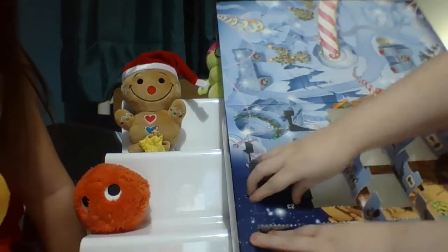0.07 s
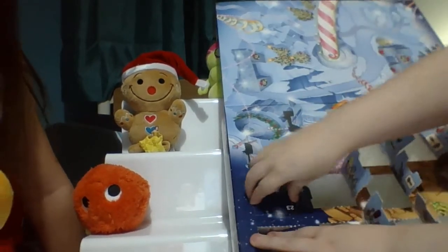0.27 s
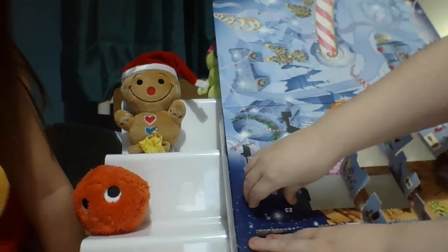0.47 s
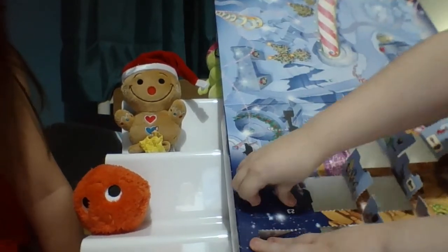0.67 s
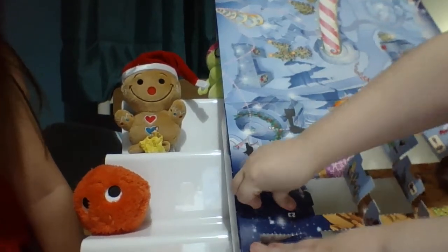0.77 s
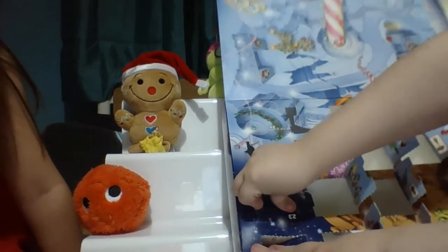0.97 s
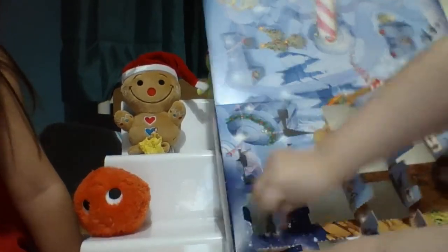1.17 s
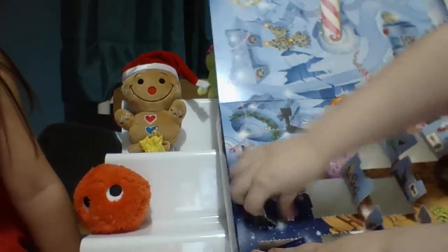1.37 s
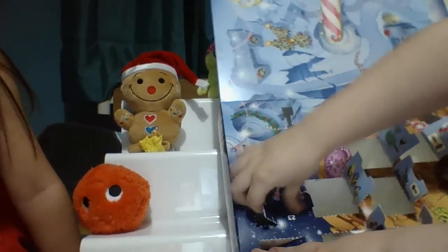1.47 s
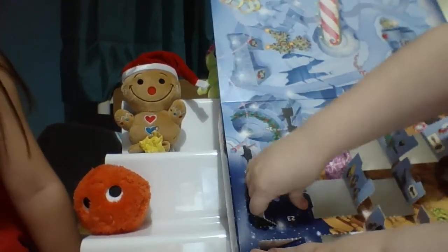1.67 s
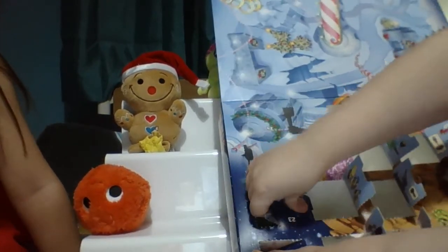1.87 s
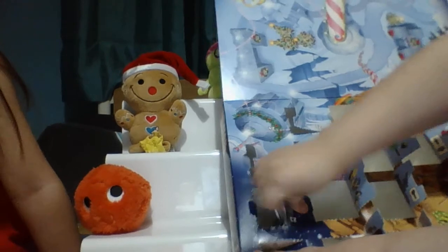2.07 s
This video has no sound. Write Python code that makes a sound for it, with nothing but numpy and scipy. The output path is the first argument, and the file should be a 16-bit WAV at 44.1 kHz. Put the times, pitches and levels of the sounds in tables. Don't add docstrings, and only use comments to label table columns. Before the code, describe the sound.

A perforated cardboard door is felt by fingers, then breaks with a bright loud pop, crackles as the flap is worked and tears open in a final clustered snap, close up, with short room echoes and faint hiss.

```python
import sys
import numpy as np
from scipy import signal
from scipy.fft import rfft, irfft, next_fast_len
from scipy.io import wavfile
from scipy.ndimage import uniform_filter1d

SR = 44100
rng = np.random.default_rng(int(sys.argv[2]) if len(sys.argv) > 2 else 0)


def pcm_store(signal):
    levels = np.round(np.clip(np.atleast_2d(signal), -1, 1) * 32767)
    wavfile.write(sys.argv[1], SR, levels.astype(np.int16).T)


def how_loud(loudness_db):
    steps = np.asarray(loudness_db, float) / 20
    return 10 ** steps


N = 94065


def unit(x):
    return x / np.sqrt(np.mean(x ** 2) + 1e-20)


def along(points, hz):
    f, v = np.transpose(points)
    return np.interp(np.log(hz + 1), np.log(f + 1), v)


def filtered(x, response):
    m = next_fast_len(x.shape[-1] + 8192)
    spectrum = rfft(x, m) * response(np.fft.rfftfreq(m, 1 / SR))
    return irfft(spectrum, m)[..., :x.shape[-1]]


def causal(gain):
    c = irfft(np.log(np.maximum(gain, 1e-6)))
    c[1:len(c) // 2] *= 2
    c[len(c) // 2 + 1:] = 0
    return np.exp(rfft(c))


def ring(f, peaks):
    total = 0
    for k, (centre, width, db) in enumerate(peaks):
        damping = 1j * f * width
        total = total + (-1) ** k * how_loud(db) * damping / (centre * centre - f * f + damping)
    return total


# (frequency [Hz], density [dB per Hz])
HUSH_SPECTRUM = [(47, -90.5), (80, -12.5), (190, 5), (408, -9.5), (460, 1.5), (605, -6.5), (722, -4),
                 (3760, -13.5), (8750, -26.5), (11400, -50.5), (19200, -120)]


def air():
    hush = filtered(rng.standard_normal(N), lambda f: how_loud(along(HUSH_SPECTRUM, f)))
    whine = filtered(rng.standard_normal(N), lambda f: ring(f, [(1570, 12, 0)]))
    return how_loud(-66) * unit(hush) + how_loud(-79.5) * unit(whine)


def bent(table, s, hz):
    _, hz_a, db_a, hz_b, db_b = [row for row in table if row[0] <= s][-1]

    def bump(centre):
        octaves = np.log2((hz + 1) / centre)
        return np.exp(-.5 * (octaves / .14) ** 2)

    return how_loud(db_a * bump(hz_a) + db_b * bump(hz_b))


def even(spectrum, hz):
    smooth_hz = 220
    power = abs(uniform_filter1d(abs(spectrum) ** 2, round(smooth_hz / hz[1])))
    return spectrum * causal(np.sqrt(power.mean() / (power + 1e-20)))


# (time [s], crack peak [dB], panel peak [dB], burst length [s], brightness [dB])
TOUCH = [(0.0425, -58, -48, 0.008, -10), (0.066, -52, -52, 0.005, -11), (0.103, -48, -46, 0.008, -10),
         (0.135, -54, -54, 0.004, -1), (0.147, -62, -53, 0.008, -7), (0.195, -61, -57, 0.008, -9),
         (0.235, -60, -57, 0.008, -6), (0.315, -57, -54, 0.004, -5), (0.349, -54, -54, 0.004, -14),
         (0.36, -56, -54, 0.008, -11), (0.372, -53, -55, 0.008, -9), (0.384, -55, -49, 0.004, -7),
         (0.411, -53, -54, 0.004, -13), (0.422, -54, -52, 0.008, -13), (0.433, -54, -52, 0.009, -14),
         (0.49, -59, -60, 0.02, -2), (0.55, -59, -61, 0.02, -2), (0.62, -59, -56, 0.015, -6),
         (0.725, -58, -57, 0.01, -4), (0.75, -57, -55, 0.02, -7), (0.785, -59, -60, 0.002, -8),
         (0.824, -56, -58, 0.002, -7), (0.868, -58, -62, 0.002, -4)]
PUSH = [(1.0745, -21, -30, 0.002, -1), (1.0776, 2, -11, 0.0035, -1), (1.0815, 2, -11, 0.0015, -6),
        (1.085, -14, -10, 0.001, -3), (1.0915, -15, -17, 0.002, -5), (1.0968, -8, -15, 0.0005, -3),
        (1.1092, -13, -19, 0.001, -8), (1.1118, -20, -10, 0.003, -8), (1.1192, -16, -19, 0.002, -2),
        (1.976, -33, -38, 0.005, -3), (1.9828, -2, -3, 0.0018, -10), (1.9895, -18, -14, 0.001, -10),
        (2.0012, -12, -6, 0.0015, -7), (2.0242, 0, -5, 0.002, -6), (2.0275, -3, -6, 0.0015, -16),
        (2.0368, -15, -15, 0.003, -9), (2.0452, -9, -9, 0.0015, -12), (2.054, -20, -15, 0.002, -11),
        (2.073, -21, -19, 0.002, -8), (2.087, -26, -29, 0.003, -9), (2.1025, -20, -17, 0.001, -5),
        (2.1105, -30, -25, 0.002, -3)]
CRACKLE = [(1.3432, -29, -42, 0.0015, -6), (1.3452, -21, -29, 0.003, -11), (1.3525, -29, -29, 0.007, -11),
           (1.361, -28, -32, 0.003, 0), (1.3705, -42, -43, 0.003, -2), (1.3975, -56, -45, 0.005, -7),
           (1.4085, -20, -27, 0.002, -5), (1.4155, -34, -30, 0.006, -9), (1.4255, -40, -35, 0.004, -3),
           (1.4335, -38, -29, 0.004, -5), (1.4415, -45, -34, 0.002, -11), (1.4502, -32, -34, 0.002, -6),
           (1.46, -39, -42, 0.006, -3), (1.47, -34, -39, 0.009, -5), (1.4808, -26, -32, 0.004, -5),
           (1.49, -43, -40, 0.002, -5), (1.5045, -53, -52, 0.003, -6), (1.5545, -61, -54, 0.003, 2),
           (1.5912, -30, -37, 0.003, -2), (1.5945, -27, -28, 0.004, -1), (1.601, -29, -28, 0.004, -8),
           (1.6065, -35, -30, 0.004, -8), (1.612, -45, -37, 0.004, -7), (1.6485, -51, -52, 0.002, -5),
           (1.7735, -33, -38, 0.004, -2), (1.7795, -22, -21, 0.005, -7), (1.7865, -30, -30, 0.002, -6),
        (1.8385, -52, -63, 0.001, -7), (1.8505, -16, -23, 0.0035, 3), (1.8545, -28, -27, 0.003, 1),
        (1.861, -27, -36, 0.004, -1), (1.8848, -24, -56, 0.0005, -3), (1.896, -40, -58, 0.004, 1),
        (1.9015, -15, -42, 0.0015, 7), (1.9075, -35, -39, 0.003, 2), (1.9135, -41, -47, 0.001, 13),
        (1.938, -50, -54, 0.002, -1)]
# (frequency [Hz], width [Hz], level [dB])
FIBRE_MODES = [(1780, 240, 0), (2900, 330, -1), (3450, 330, -3), (4200, 330, -6), (4800, 380, -4),
               (5950, 450, -3), (6800, 600, -8)]
# (frequency [Hz], width [Hz], level [dB])
PANEL_MODES = [(179.6, 59, -11), (402.4, 120, -6), (512, 56, -0.5), (649, 270, -3), (985, 300, -2.5),
               (1394, 333, -9.5)]
# (from [s], mode [Hz], lift [dB], mode [Hz], lift [dB])
FIBRE_BEND = [(0, 1756, 5, 2652, 2), (.3, 1756, 8, 3415, -3), (1.07, 1500, 7, 2250, 7),
              (1.09, 1450, 8, 3200, 3), (1.106, 1902, 3, 3070, 3), (1.34, 1779, 3, 3281, 10),
              (1.39, 1497, 6, 3030, 5), (1.425, 1700, -14, 3030, 3), (1.448, 1733, 5, 3507, 2),
              (1.468, 1779, 2, 2835, 6), (1.59, 1733, 7, 4826, 6), (1.77, 1665, 11, 6050, 5),
              (1.83, 1900, 4, 6050, 9), (1.88, 1803, 6, 4006, 2), (1.89, 1779, 7, 4800, 5),
              (1.97, 1750, -18, 3150, 5), (2.0, 1900, 3, 2450, 4), (2.023, 2482, 9, 1780, -6),
              (2.044, 1950, 6, 3100, -8), (2.07, 3000, -5, 2416, 5), (2.1, 1800, 0, 3461, 6)]
# (from [s], mode [Hz], lift [dB], mode [Hz], lift [dB])
PANEL_BEND = [(0, 550, 10.5, 241, 1.5), (.3, 448.5, 10, 1052, 4), (1.07, 976, 11.5, 476, 0),
              (1.09, 1023, 6.5, 487, 12.5), (1.106, 579, 4, 1180, 8), (1.34, 487, 8, 965, 4),
              (1.39, 645, 7.5, 261.5, 11), (1.425, 612, 12, 324, 13), (1.448, 644, 8, 320, 11.5),
              (1.468, 563, 5, 966, 6), (1.59, 1054, 8, 457, 8.5), (1.77, 970, 9.5, 394, -10),
              (1.83, 848, 10, 546, 5.5), (1.97, 857, 6.5, 346, 8), (2.0, 668, 9, 259, 2),
              (2.023, 963, 5.5, 247, -11.5), (2.044, 539.6, 9.5, 244, -6), (2.07, 590, 2, 247, -6),
              (2.1, 742, 4, 246, -5)]


def snaps():
    size = 4096
    crack_t60, crumbs_t60, panel_t60, hum_t60 = 0.0092, 0.032, 0.02, 0.067
    crumbs_db, hum_db, sag_db, spiky_db, tint_db = -35, -16, 1.5, 7, 1
    rise_s, kick_at, kick, panel_kick = .0002, 8, 2.42, 1.59
    t, hz = np.arange(size) / SR, np.fft.rfftfreq(2 * size, 1 / SR)
    fibre = causal(abs(ring(hz, FIBRE_MODES)) / (1 + (1170 / (hz + 1)) ** 4))
    panel = causal(abs(ring(hz, PANEL_MODES)))
    brightness_tilt = np.clip(np.log2(hz / 3500 + 0.53), -1, 1)
    out = np.zeros(N + size)
    for s, crack_db, panel_db, length, bright_db in PUSH + CRACKLE + TOUCH:
        noise = rng.standard_normal((3, size))
        knots = rng.standard_normal((2, 20))
        spikiness = spiky_db * min(length / 0.0027, 1)
        spikes = how_loud(spikiness * np.repeat(rng.standard_normal(size // 32), 32))
        noise[:, kick_at] = kick * np.abs(noise).max() * np.array([1, 1, panel_kick])

        tint = how_loud(tint_db * np.array([np.interp(hz, np.linspace(0, 10000, 20), k) for k in knots]))
        tint *= [bent(FIBRE_BEND, s, hz), bent(PANEL_BEND, s, hz)]
        bright = how_loud((bright_db + 1) * brightness_tilt)
        fibre_shape = fibre * causal(tint[0] * bright)
        panel_shape = panel * causal(tint[1])

        over = np.maximum(t - length, 0)
        rise = (1 - np.exp(-t / rise_s)) * how_loud(-sag_db * np.minimum(t / length, 1))
        crack = how_loud(-60 * over / crack_t60) * noise[0]
        crumbs = how_loud(crumbs_db - 60 * t / crumbs_t60) * noise[1]
        shake = how_loud(-60 * over / panel_t60) + how_loud(hum_db - 60 * t / hum_t60)
        parts = [(rise * spikes * (crack + crumbs), fibre_shape, crack_db),
                 (rise * noise[2] * shake, panel_shape, panel_db)]
        for part, shape, db in parts:
            burst = irfft(even(rfft(part, 2 * size), hz) * shape)[:size]
            out[round(s * SR):][:size] += how_loud(db) * burst / abs(burst).max()
    return out[:N]


# (frequency [Hz], t60 [s])
ROOM_T60 = [(200, 1), (500, 0.29), (1300, 0.48), (3000, 0.35), (6500, 0.27), (9000, 0.27)]


def room(x):
    hz, t, z = signal.stft(rng.standard_normal(SR // 2), SR, nperseg=256)
    decay = how_loud(-60 * t / along(ROOM_T60, hz)[:, None])
    tail = signal.istft(z * decay, SR, nperseg=256)[1]
    delayed = np.pad(x, (200, 0))
    return signal.fftconvolve(delayed, tail / np.linalg.norm(tail))[:N]


def gate(x):
    threshold_db, window_s, depth_db, knee_db = -41.5, 0.016, 10, 5
    power = abs(uniform_filter1d(x ** 2, round(window_s * SR)))
    level_db = 10 * np.log10(power + 1e-12)
    return x * how_loud(-depth_db * np.clip((threshold_db - level_db) / knee_db, 0, 4))


def creak():
    start, end, tone_hz, width_hz = .872, .872 + 0.19, 1400, 45
    t = np.arange(N) / SR
    on = np.interp(t, [start - .02, start, end, end + 0.012], [0, 1, 1, 0])
    wander = np.cumsum(rng.standard_normal(N)) * np.sqrt(2 * np.pi * width_hz / SR)
    return how_loud(-70.5) * on * unit(np.sin(2 * np.pi * tone_hz * t + wander))


def duck(card):
    depth_db, hold_s, loud_db = 8, .21, -18
    t = np.arange(SR) / SR
    loud = abs(uniform_filter1d(card ** 2, 441)) / how_loud(2 * loud_db)
    memory = np.where(t < hold_s, 1, .2 * (t < 3 * hold_s)) / 400
    held = signal.fftconvolve(loud / (1 + loud), memory)[:N]
    return how_loud(-depth_db * uniform_filter1d(np.clip(held, 0, 1), 1500))


def scene():
    card = snaps()
    strained = card + creak()
    echoes = gate(how_loud(-13) * room(card))
    hush = duck(card) * air()
    return (strained + echoes + hush)[None]


def roll_off(x):
    return signal.sosfilt(signal.butter(12, 16000, fs=SR, output="sos"), x)


def record(dry):
    clip_top, low_hz, top_hz, thump_db, sizzle_db, hiss_db = .9, 126.4, 8220, -43.5, -42, -100
    x = filtered(dry, lambda f: causal(1 / (1 + (low_hz / (f + 1)) ** 6) + 0.00081))
    hard = x / (1 + abs(x / clip_top) ** 8) ** (1 / 8)
    hard = filtered(hard, lambda f: causal(1 / (1 + (f / top_hz) ** 20) + how_loud(sizzle_db)))

    def bend(f):
        thump = how_loud(thump_db) * f / (f + 40) * (f < 300)
        sizzle = how_loud(sizzle_db) * (f > 9000) * (f < 16000)
        return thump + sizzle

    mix = hard + filtered(abs(hard), bend) + how_loud(hiss_db) * rng.standard_normal(x.shape)
    return roll_off(mix)


dry = scene()
out = record(dry)
pcm_store(out)
```